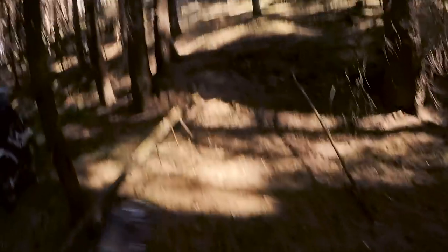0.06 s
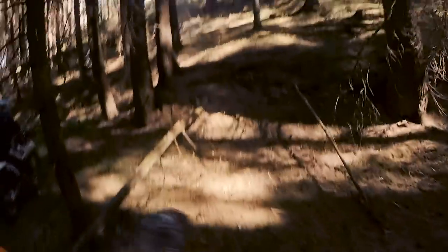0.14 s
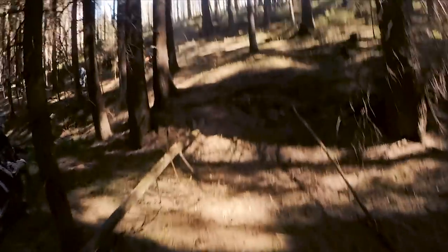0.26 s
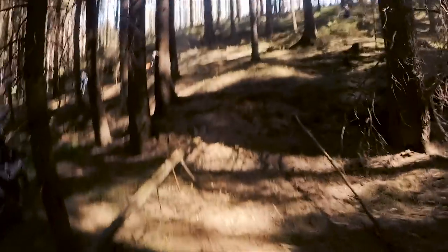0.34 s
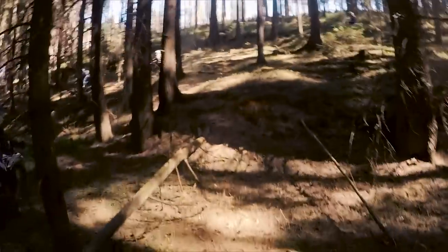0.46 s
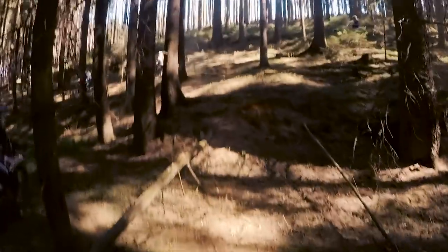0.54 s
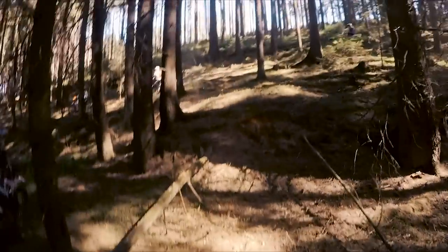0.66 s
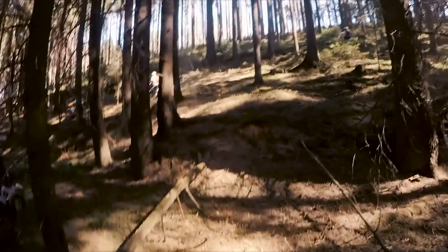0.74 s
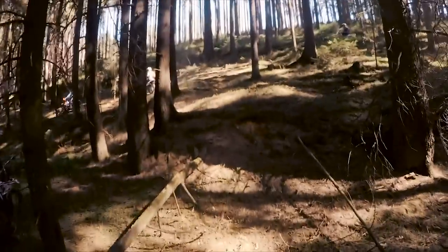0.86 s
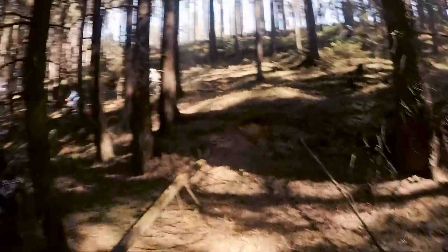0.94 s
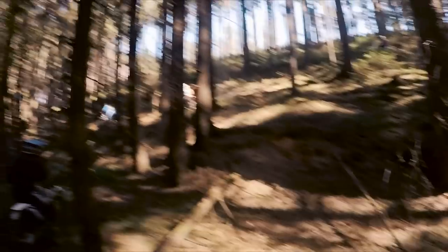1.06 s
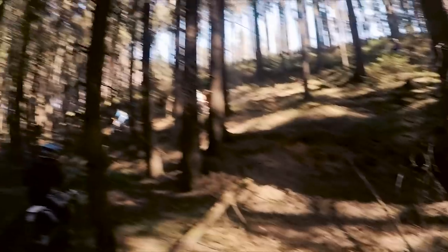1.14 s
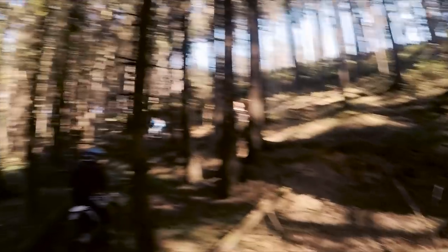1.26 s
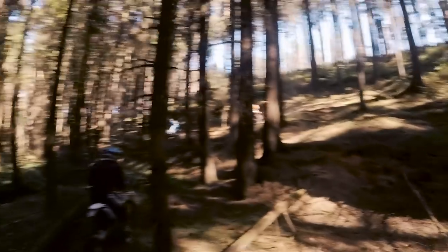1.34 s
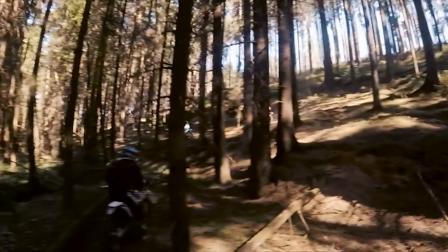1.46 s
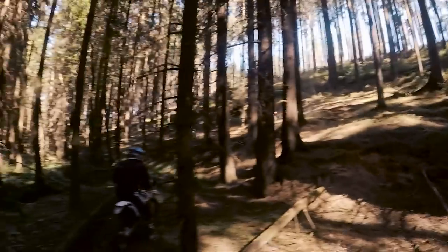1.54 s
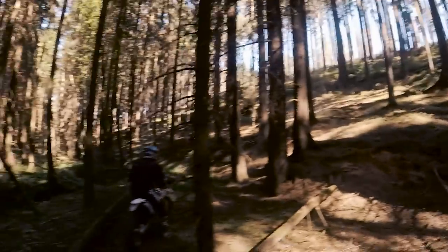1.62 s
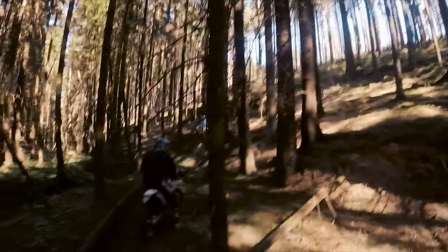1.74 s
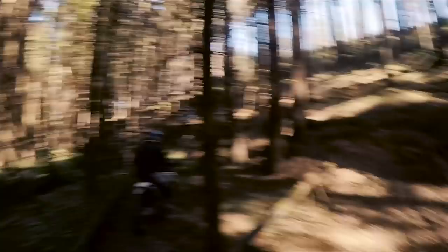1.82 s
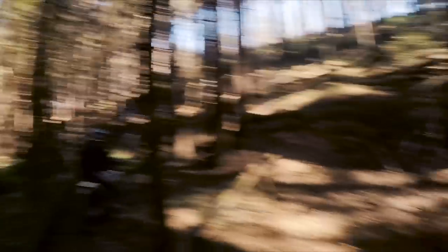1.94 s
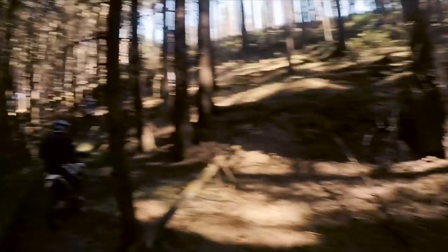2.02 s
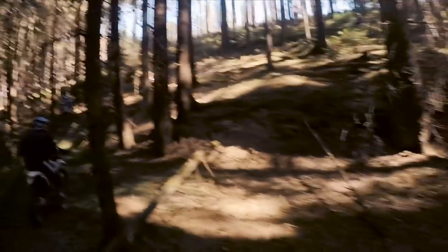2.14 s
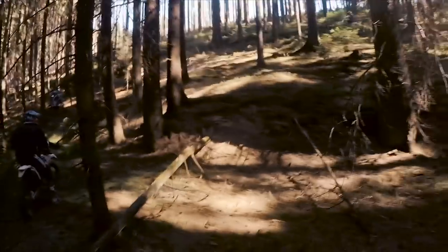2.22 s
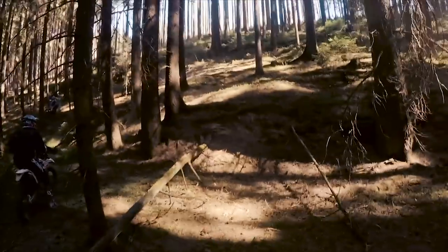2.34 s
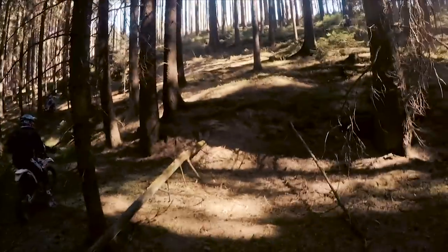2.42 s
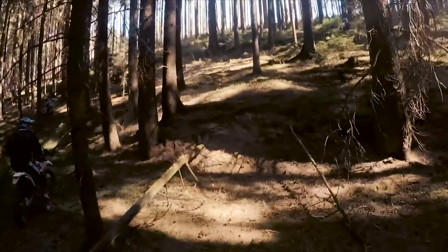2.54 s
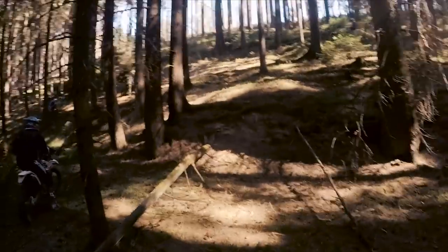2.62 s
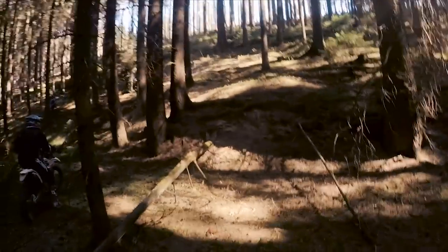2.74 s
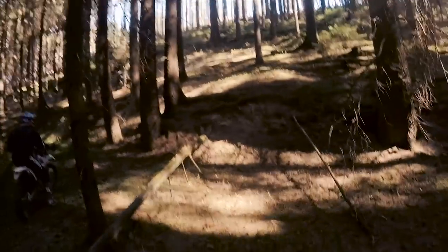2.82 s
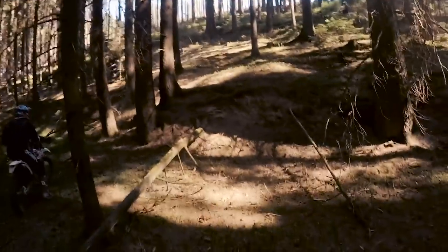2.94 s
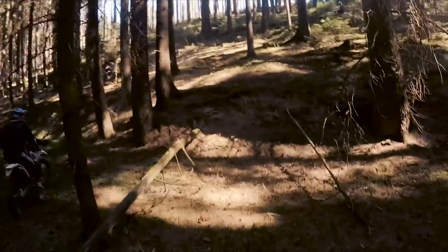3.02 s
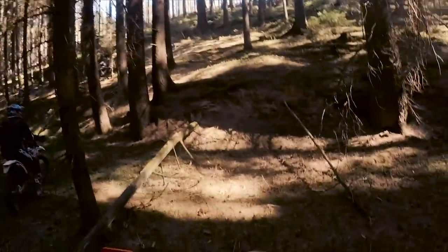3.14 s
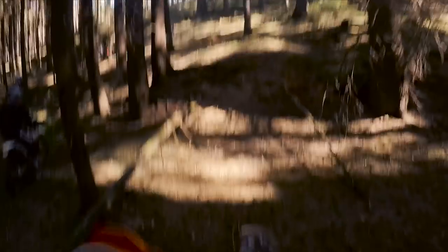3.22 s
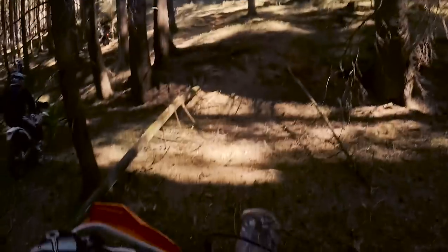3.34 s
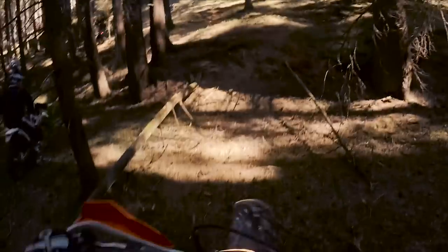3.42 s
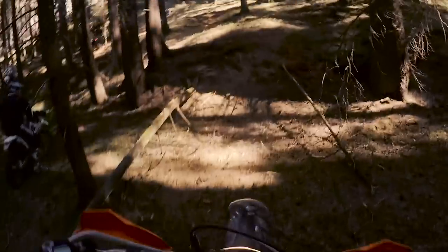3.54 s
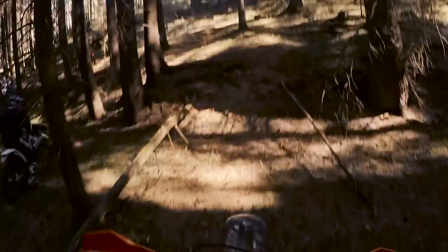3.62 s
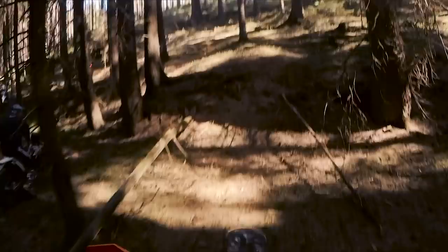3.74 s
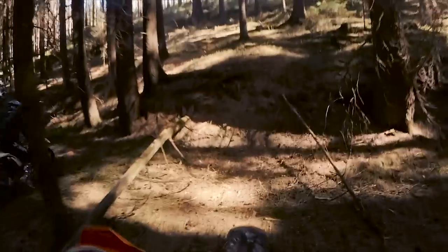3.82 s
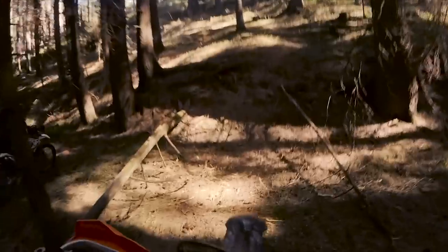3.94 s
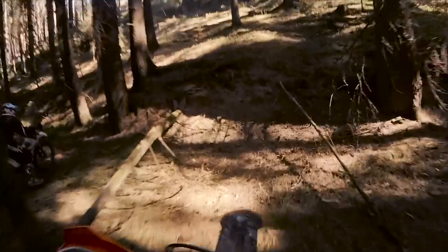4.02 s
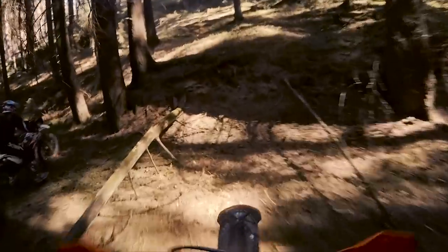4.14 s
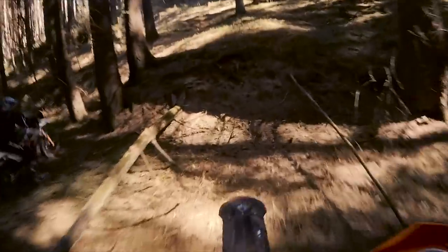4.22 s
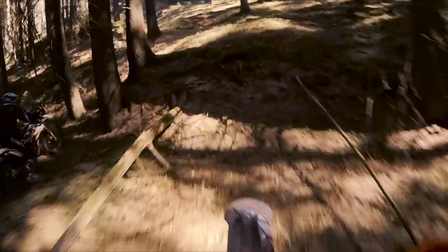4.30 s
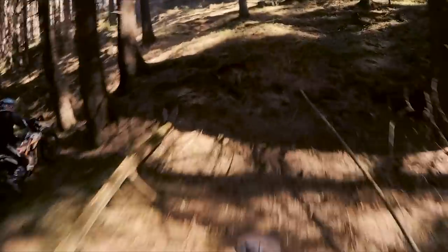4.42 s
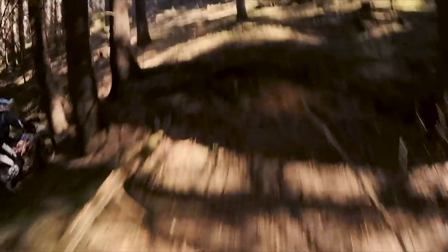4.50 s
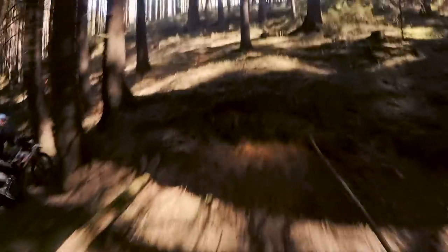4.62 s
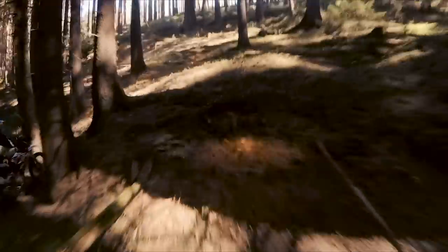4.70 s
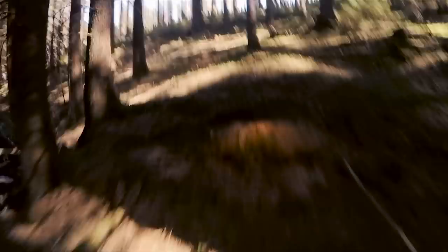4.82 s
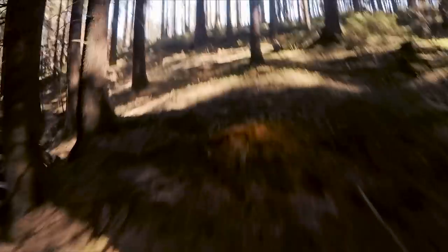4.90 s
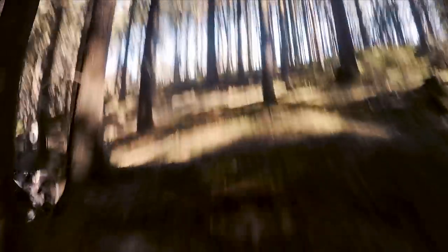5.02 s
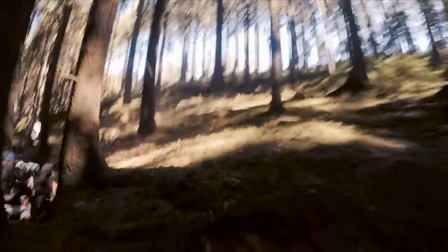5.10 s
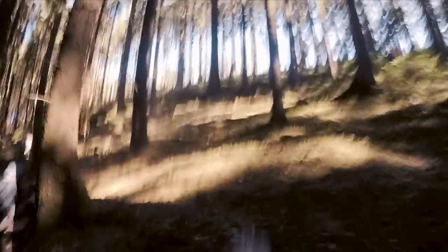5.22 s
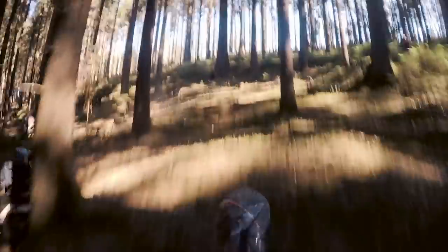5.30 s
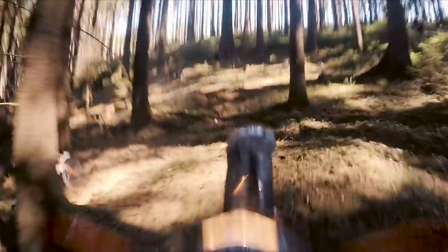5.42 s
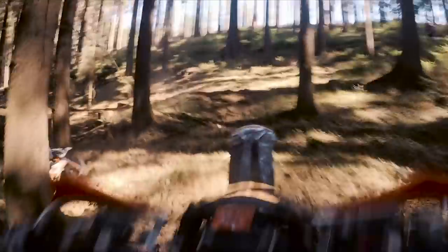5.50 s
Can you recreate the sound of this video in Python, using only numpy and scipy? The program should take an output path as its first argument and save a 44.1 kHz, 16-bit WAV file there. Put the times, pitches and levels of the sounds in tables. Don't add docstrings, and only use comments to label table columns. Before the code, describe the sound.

Close helmet microphone, open woodland with no obvious echo. A dirt bike engine winds down into a rough low putter with small cracks and metallic rattling, nearly quiet. Three throttle bursts follow: a fast rise, a longer buzzing pull, then after a sharp drop and popping misfires, a hard climb to the highest pitch, sinking slightly at the end. Soft wind rumble underneath.

```python
import sys
import numpy as np
from scipy import signal
from scipy.fft import rfft, irfft, next_fast_len
from scipy.io import wavfile
from scipy.ndimage import uniform_filter1d

SR = 44100
rng = np.random.default_rng(int(sys.argv[2]) if len(sys.argv) > 2 else 0)


def invert_db(x):
    u = np.asarray(x, float) / 20
    return 10 ** u


def pcm_store(signal):
    levels = np.round(np.clip(np.atleast_2d(signal), -1, 1) * 32767)
    wavfile.write(sys.argv[1], SR, levels.astype(np.int16).T)


N = 245195
TIME_S = np.arange(N) / SR


def in_time(rows):
    time_s, *columns = np.transpose(rows)
    return [np.interp(TIME_S, time_s, column) for column in columns]


def bumps(times_s, db, width_s):
    return sum(d * np.exp(-((TIME_S - s) / width_s) ** 2) for s, d in zip(times_s, db))


def drift(rate):
    steps = rng.standard_normal(int(N / SR * 100))
    return np.interp(TIME_S * rate, np.arange(len(steps)), steps)


def clicks(times_s, db):
    out = np.zeros(N)
    np.add.at(out, (np.asarray(times_s) * SR).astype(int), invert_db(db))
    return out


def evened(x, window_s=0.097):
    size = int(window_s * SR)
    power = uniform_filter1d(x ** 2, size, mode="reflect")
    power = uniform_filter1d(power, size, mode="reflect")
    return x / np.sqrt(np.maximum(power, 0) + 1e-16)


def band(x, low_hz, high_hz, order=2):
    edges_hz = [low_hz, min(high_hz, .45 * SR)]
    return signal.sosfilt(signal.butter(order, edges_hz, "band", fs=SR, output="sos"), x + 1e-18)


def coloured(spectrum):
    hz = np.maximum(np.arange(N // 2 + 1) * SR / N, 1)
    table_hz, table_db = np.transpose(spectrum)
    shape_db = np.interp(np.log(hz), np.log(table_hz), table_db)
    noise = irfft(rfft(rng.standard_normal(N)) * invert_db(shape_db), N)
    return noise / noise.std()


def resonate(x, modes, patchy_db=0):
    out = 0
    for k, (hz, width_hz, db) in enumerate(modes):
        r = np.exp(-np.pi * width_hz / SR)
        poles = [1, -2 * r * np.cos(2 * np.pi * hz / SR), r * r]
        ring = signal.lfilter([1, 0, -1], poles, x + 1e-18)
        swell_db = patchy_db * drift(8) if patchy_db else 0
        sign = (-1) ** k
        out = out + sign * invert_db(db + swell_db) * (1 - r * r) / 2 * ring
    return out


def lift(x, hz, width_hz, db):
    r, ring, state = np.exp(-np.pi * width_hz / SR), np.zeros(N), np.zeros(2)
    for i in range(0, N, 256):
        poles = [1, -2 * r * np.cos(2 * np.pi * hz[i] / SR), r * r]
        ring[i:i + 256], state = signal.lfilter([1, 0, -1], poles, x[i:i + 256], zi=state)
    return x + invert_db(db) * (1 - r * r) / 2 * ring


def smear(x, delays_ms, gain):
    size = next_fast_len(N + SR // 2)
    spectrum, hz = rfft(x, size), np.arange(size // 2 + 1) * SR / size
    for ms in delays_ms:
        echo = np.exp(-2j * np.pi * hz * ms / 1000)
        spectrum = spectrum * (echo - gain) / (1 - gain * echo)
    return irfft(spectrum, size)[:N]


# pitch_hz, level_db (per Hz)
WIND = [(12, -42), (24, 18.5), (110, 4), (140, -34), (240, -120)]
# time_s, level_db
GUSTS = [(0, -49.5), (1.4, -52.5), (2.8, -60.5), (3.5, -44), (4.3, -50), (5.56, -47)]


def wind():
    gust_db = in_time(GUSTS)[0]
    return invert_db(gust_db + 3.5 * drift(8.4)) * coloured(WIND)


# time_s, low_hz, high_hz, level_db
SPLITS = [(4.875, 4200, 7000, -38), (4.9, 5200, 7500, -38), (4.9, 14000, 15900, -40),
          (4.92, 10300, 12500, -38), (5.01, 8300, 10400, -40)]


def splits():
    noise = rng.standard_normal(N)
    out = 0
    for time_s, low_hz, high_hz, db in SPLITS:
        patch = np.cos(np.pi / 2 * np.clip((TIME_S - time_s) / .022, -1, 1))
        out = out + invert_db(db) * patch * evened(band(noise, low_hz, high_hz, order=4))
    return out


# time_s, peak_db, pitch_hz
TICKS = [(1.4366, -55, 5490), (1.947, -35, 4990), (1.9748, -41, 9280), (1.9894, -46, 4860),
         (2.0283, -43, 9590), (2.0424, -42, 6780), (2.3895, -45, 5150), (3.795, -12, 1950),
         (4.3835, -25, 6320)]
# time_s, peak_db, pitch_hz
LEVER = (1.947, -29, 2670)


def ticks():
    return sum(resonate(clicks([s], db + 20.5), [(hz, 400, 0)]) for s, db, hz in [*TICKS, LEVER])


# start_s, end_s, pitch_hz,
# width_hz, level_db
SINGING = [(4.02, 4.24, 5060, 35, -43), (4.8, 5.27, 3228, 35, -42), (5.07, 5.21, 3225, 25, -42),
           (2.55, 2.83, 5600, 2500, -65), (3.15, 3.35, 3230, 120, -49), (-.04, .6, 2650, 350, -53),
           (-.04, .4, 3300, 250, -51), (1.3, 2.05, 135, 20, -59), (5.32, 5.45, 1290, 45, -31),
           (5.46, 5.6, 1010, 40, -35)]


def singing():
    out = 0
    for start_s, end_s, hz, width_hz, db in SINGING:
        swell = np.clip(np.minimum(TIME_S - start_s, end_s - TIME_S) / .04, 0, 1)
        mode = [(hz, width_hz, 0)]
        ring = resonate(resonate(rng.standard_normal(N), mode), mode)
        out = out + invert_db(db) * swell * evened(ring, window_s=.05)
    return out


# time_s, crack_peak_db, thump_db
JOLTS = [(1.5588, -49, -41), (1.801, -45, -40), (2.1007, -45, -34.5), (2.2913, -45, -34), (2.482, -48, -36),
         (2.5846, -47, -47), (2.8112, -54, -50)]
# time_s, peak_db
CRACKS = [(0.2994, -35), (0.9068, -36.5), (2.9264, -43.5), (3.3273, -22), (4.283, -32), (4.3296, -27.5)]


def jolts():
    jolt_s, jolt_db, thump_db = np.transpose(JOLTS)
    crack_s, crack_db = np.transpose(CRACKS)
    fade = np.exp(-1 / (0.0052 * SR))
    taps = clicks(jolt_s, jolt_db) + clicks(crack_s, crack_db - 3)
    crack = signal.lfilter([1], [1, -fade], taps) * band(rng.standard_normal(N), 3000, 19000)
    thump = resonate(clicks(jolt_s + .004, thump_db + 41), [(110, 70, 0), (300, 200, -5)])
    return crack + thump


# time_s, speed_turns_per_s
REVS_COASTING = [(0, 91), (.092, 84), (.39, 67.7), (.604, 55.8), (.858, 49.7), (.992, 48.5), (1.2, 43.4)]
REVS_IDLE = [(1.35, 36), (1.55, 36.72), (1.849, 34), (2.299, 31.7), (2.802, 30.73)]
REVS_FIRST_BLIP = [(2.85, 34.48), (2.98, 48.64), (3.11, 71.74), (3.23, 96.6), (3.29, 106.1), (3.315, 106.5),
                   (3.39, 92.2), (3.46, 75.6)]
REVS_SECOND_BLIP = [(3.54, 77.63), (3.62, 86.9), (3.71, 94.44), (3.78, 98.1), (3.895, 92.45),
                    (4.089, 105.4), (4.199, 106.1), (4.25, 98.1), (4.42, 53.9)]
REVS_THIRD_BLIP = [(4.46, 55), (4.55, 72.6), (4.64, 81), (4.701, 98.8), (4.74, 108.4), (4.829, 124.5),
                   (4.892, 136.8), (4.91, 136), (4.981, 122.3)]
REVS_RUN_OUT = [(5.07, 128.2), (5.14, 125.1), (5.22, 122.2), (5.38, 100.6), (5.49, 94.5), (5.56, 90.6)]


def revs():
    return in_time([*REVS_COASTING, *REVS_IDLE, *REVS_FIRST_BLIP,
                    *REVS_SECOND_BLIP, *REVS_THIRD_BLIP, *REVS_RUN_OUT])[0]


# throttle (0-1), unevenness_db of firing, turbulent share (0-1)
OVERRUN, IDLING, CATCHING = (0, 1.3, .4), (.15, 2.5, .8), (1, 3, .3)
PULLING, STUMBLING, EASING = (1, .7, .11), (.45, 2.7, .62), (.2, 1.5, .36)
# start_s, way of burning (as above)
HAND = [(0, OVERRUN), (1.14, IDLING), (2.85, CATCHING), (2.96, PULLING), (3.31, STUMBLING),
        (3.465, PULLING), (3.79, CATCHING), (3.915, PULLING), (4.235, STUMBLING), (4.395, PULLING),
        (5.285, EASING)]


def hand():
    times_s, states = zip(*HAND)
    now = np.searchsorted(times_s, TIME_S, side="right") - 1
    fade_s = .045
    return uniform_filter1d(np.array(states).T[:, now], int(fade_s * SR), mode="nearest")


def crank():
    early_revs = np.pad(revs()[350:], (0, 350), "edge")
    turns = .999 + np.cumsum(early_revs) / SR
    turn = turns.astype(int)
    uneven_db = hand()[1]
    chance = rng.standard_normal(800)
    chance[1:] -= 0.14 * chance[:-1]
    strength = invert_db(uneven_db * chance[turn])
    firings = np.diff(turn, prepend=0) * strength
    return turns - turn, firings, strength


def gate(angle, sharp, steady):
    return steady + np.exp(-sharp * angle)


def by_revs(open_rows, climb_rows, shut_rows):
    speed, throttle = revs(), hand()[0]

    def read(rows):
        table_speed, *columns = np.transpose(rows)
        return np.array([np.interp(speed, table_speed, column) for column in columns])

    climb_from_s = 4.33
    pulling = np.where(TIME_S < climb_from_s, read(open_rows), read(climb_rows))
    return throttle * pulling + (1 - throttle) * read(shut_rows)


# time_s, level_db
EFFORT_COASTING = [(0, -21.5), (.308, -27.5), (.59, -30), (.942, -33), (1.1, -36), (1.135, -41.5),
                   (1.25, -45.5)]
EFFORT_IDLE = [(1.45, -47.5), (1.75, -49.5), (2.1, -49), (2.2, -44), (2.28, -47.5), (2.46, -50),
               (2.62, -46.5), (2.8, -48.5)]
EFFORT_FIRST_BLIP = [(2.85, -44.5), (2.912, -39.5), (2.928, -33.5), (3.046, -18.5), (3.104, -19.5),
                     (3.286, -12.5), (3.396, -20), (3.46, -19.5)]
EFFORT_SECOND_BLIP = [(3.48, -17.5), (3.798, -15), (3.864, -18), (4.124, -13), (4.204, -13.5),
                      (4.266, -19.5), (4.36, -25)]
EFFORT_THIRD_BLIP = [(4.38, -19.5), (4.39, -16), (4.416, -16), (4.518, -12.5), (4.654, -13.5),
                     (4.718, -8.5), (4.846, -15), (4.95, -17.5), (4.98, -17)]
EFFORT_RUN_OUT = [(5.02, -15.5), (5.26, -18.5), (5.308, -22), (5.406, -20), (5.488, -19.5), (5.56, -19)]
# time_s, loss_db
MISFIRES = [(3.268, -5.5), (3.309, -8.5), (3.36, -4), (3.44, -5), (3.468, -1), (3.83, -1.5), (3.875, -4),
            (4.27, -5.5), (4.37, 0)]
# speed_turns_per_s, thud_db, pipe_db, upper_pipe_db, rattle_db, hiss_db
PARTS_OPEN = [(40, -2, -3.5, -9, -14.5, -21.5), (56.6, -18, -1, -15.5, -20, -26.5),
              (75.3, -12.5, -1, -8.5, -14, -22), (93.23, -7, -2, -9, -10, -19),
              (107.02, -10, -2, -9, -11.5, -16)]
PARTS_CLIMB = [(55.53, -13.5, -1.48, -9, -17.5, -26), (75.4, -17, 0.25, -8.5, -16, -23.5),
               (96.53, -13.5, -1.42, -8.5, -12.5, -18.5), (110.4, -9.5, -0.62, -9.5, -13.5, -15),
               (123.8, -13, -2.6, -9, -10.5, -14), (138.7, -11.5, -0.58, -5, -16.5, -11)]
PARTS_SHUT = [(31.8, -2.5, -4, -6.5, -6, -10.5), (41, -7, -10, -6, -8, -13),
              (48.5, -5, -3.5, -5.5, -8, -17), (62, -4.5, -15, -5, -10.5, -18.5),
              (69, -11.5, -9, -4, -6.5, -17), (85.4, -5.5, -12.5, -2.5, -5.5, -15),
              (102, -10, -6, -9.5, -5, -14)]


def levels():
    effort, = in_time([*EFFORT_COASTING, *EFFORT_IDLE, *EFFORT_FIRST_BLIP,
                       *EFFORT_SECOND_BLIP, *EFFORT_THIRD_BLIP, *EFFORT_RUN_OUT])
    jolt_s = [s + 0.006 for s, *_ in JOLTS]
    effort = effort + bumps(jolt_s, [3.5] * len(jolt_s), width_s=0.014)
    miss_s, loss_db = np.transpose(MISFIRES)
    felt = (0.15, 0.88, 1.595, 0.29, 0.69)
    missed = np.outer(felt, bumps(miss_s, loss_db, width_s=0.0059))
    return effort + missed + by_revs(PARTS_OPEN, PARTS_CLIMB, PARTS_SHUT)


# speed_turns_per_s, pipe_hz, upper_pipe_hz, casing_hz
TUNING_OPEN = [(56, 253, 510, 1088), (74.93, 263, 575, 1116.5), (84, 128, 705, 1245),
               (98.7, 243, 710, 1170), (108, 176.4, 640, 1240)]
TUNING_CLIMB = [(55.3, 226, 461, 1276), (76.8, 290, 534, 1170), (96.8, 247, 390, 1117),
                (119.6, 234, 730, 1250), (138.5, 340, 480, 1530)]
TUNING_SHUT = [(32, 273, 564, 1200), (45, 260, 540, 1060), (53, 360, 610, 1040), (61.3, 340, 580, 1270),
               (73, 160, 520, 1140), (86.2, 390, 623, 1330), (94.4, 290, 600, 1060),
               (107.08, 117, 770, 1300)]


def tuning():
    return by_revs(TUNING_OPEN, TUNING_CLIMB, TUNING_SHUT)


# pitch_hz, level_db (per Hz)
HISS = [(2650, 0.5), (4500, -5.5), (5030, -1), (6890, -4), (8860, -3.5), (11600, -3.5), (13900, -3),
        (15100, -1), (15800, -14)]
# pitch_hz, width_hz, level_db
FINS = [(5240, 40, -15.5), (6300, 33, 4), (9200, 400, -13.5), (11150, 100, 0)]


def hiss(angle, db):
    air = coloured(HISS)
    air = air + resonate(air, FINS)
    shut_at_speed = (1 - hand()[0]) * np.clip(revs() / 85, 0, 1) ** 2
    air = air - 0.81 * shut_at_speed * band(air, 8600, 17000, order=1)
    flutter_db = 2.0 * drift(30) + 0.5 * drift(70)
    air = air * gate(angle, sharp=8.9, steady=1.2) * invert_db(flutter_db)
    return invert_db(db[4]) * evened(air)


def piston_ring(angle):
    puff = rng.standard_normal(N) * np.exp(-((angle - .15) / .1) ** 2)
    mode = [(3200, 350, 0)]
    return invert_db(-70.5 + 2.5 * drift(5)) * evened(resonate(resonate(puff, mode), mode))


# pitch_hz, width_hz, level_db
CASING = [(827, 108, -0.5), (980, 254, -4), (1252, 110, -1), (1480, 653, -5), (2030, 830, -5.5),
          (2660, 960, -10), (3196, 64, -6.5), (3690, 470, -16)]


def rattle(angle, firings, db, hz):
    pitched = 1 - hand()[2]
    knock = band(smear(firings, delays_ms=(.7, 1.9, 3.7), gain=0.62), 980, 3700)
    knock = resonate(knock, CASING, patchy_db=3.0)
    knock = evened(lift(knock, hz[2], width_hz=170, db=8))
    clatter = rng.standard_normal(N) * gate(angle, sharp=16.0, steady=1.0) * invert_db(2.6 * drift(25))
    body = 1.7 * pitched * invert_db(2.5 * drift(12)) * knock + evened(resonate(clatter, CASING))
    bright = invert_db(2.3 * np.log2(revs() / 90))
    body = body + (bright - 1) * band(body, 1850, 9900)
    clutch_db = bumps([4.705], [3.9], width_s=0.027)
    return invert_db(db[3] + clutch_db) * evened(band(body, 700, 4400, order=3))


# pitch_hz, width_hz, level_db
PIPE_PULLING = [(212.5, 85, -5), (243.6, 68.5, 1), (335, 287, -2.5), (422, 175, -1), (584, 67, -6),
                (621.6, 93, -6), (724, 335, -13.5)]
PIPE_COASTING = [(205, 49, -1), (242.5, 38, 3.5), (362, 220, -0.5), (424, 68, 1.5), (541, 49, -10),
                 (676, 85, -0.5), (853, 430, -6)]
# pitch_hz, width_hz, level_db
SILENCER = [(92, 40, 3.5), (131.3, 63, -3)]


def exhaust(angle, firings, strength, db, hz):
    throttle, _, turbulent = hand()
    gas = rng.standard_normal(N) * gate(angle, sharp=0.23, steady=1.0) * strength ** .5
    lag = int(0.006282 * SR)
    echoed = firings + .5 * np.pad(firings, (lag, 0))[:N]
    pulses = smear(echoed, delays_ms=(.9, 1.7), gain=0.72)

    def voiced(modes, patchy_db, rough_share):
        clean = evened(resonate(pulses, modes, patchy_db))
        rough = evened(resonate(gas, modes, patchy_db))
        return np.sqrt(1 - rough_share ** 2) * clean + rough_share * rough

    pulling = voiced(PIPE_PULLING, 1.2, turbulent)
    coasting = voiced(PIPE_COASTING, 1.8, turbulent)
    pipe = throttle * pulling + (1 - throttle) * coasting
    cold_db = bumps([2.99], [16], width_s=0.18)
    low = evened(lift(band(pipe, 179.5, 448, order=3), hz[0], width_hz=67, db=cold_db))
    upper = evened(lift(band(pipe, 334.5, 790, order=4), hz[1], width_hz=120, db=8))
    thud = evened(band(voiced(SILENCER, 0, 0.86 * turbulent), 49, 152))
    return invert_db(db[0]) * thud + invert_db(db[1]) * low - invert_db(db[2]) * upper


# time_s, peak_db
POPS = [(2.871, -36), (2.905, -30.5), (2.961, -29), (3.32, -22), (3.448, -15.5), (4.337, -16.5),
        (4.384, -8), (4.419, -24)]


def pops():
    time_s, db = np.transpose(POPS)
    return invert_db(52.5) * band(resonate(clicks(time_s, db), PIPE_PULLING[:4]), 180, 418)


def scene():
    angle, firings, strength = crank()
    db, hz = levels(), tuning()
    surroundings = wind() + ticks() + singing() + jolts()
    engine = hiss(angle, db) + piston_ring(angle) + rattle(angle, firings, db, hz)
    engine = engine + exhaust(angle, firings, strength, db, hz) + pops()
    return surroundings + engine + splits() * [[1], [-1]]


def band_limit(x):
    return signal.sosfilt(signal.butter(12, 15980, fs=SR, output="sos"), x)


def record(dry):
    rounded = dry / (1 + (dry / .8) ** 4) ** .25
    top_cut = signal.cheby2(14, 50, 16150, fs=SR, output="sos")
    mix = signal.sosfilt(top_cut, rounded)
    return band_limit(mix)


dry = scene()
out = record(dry)
pcm_store(out)
```